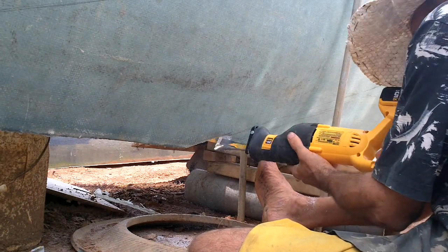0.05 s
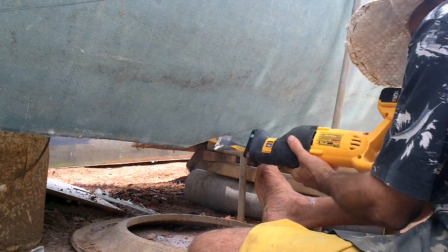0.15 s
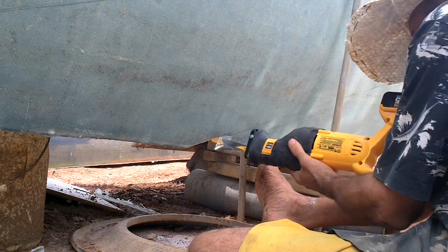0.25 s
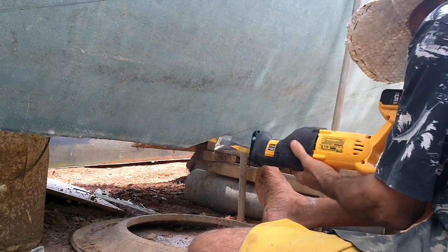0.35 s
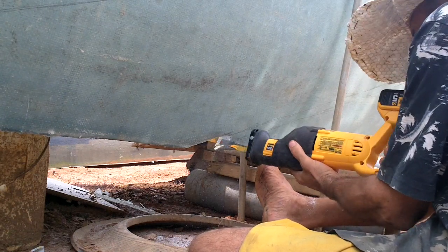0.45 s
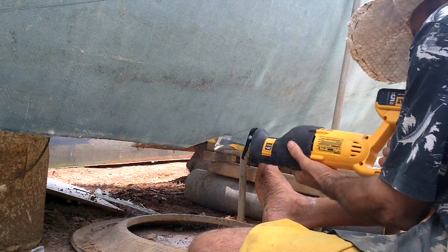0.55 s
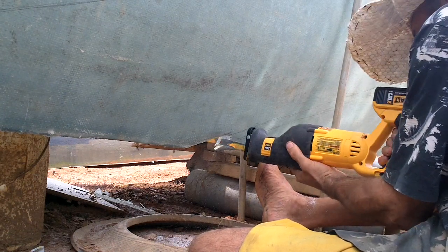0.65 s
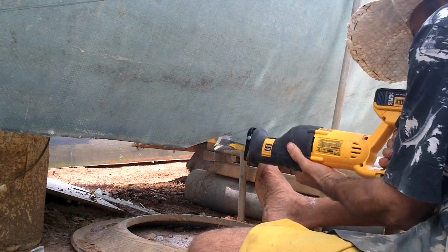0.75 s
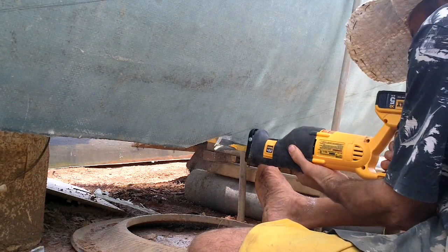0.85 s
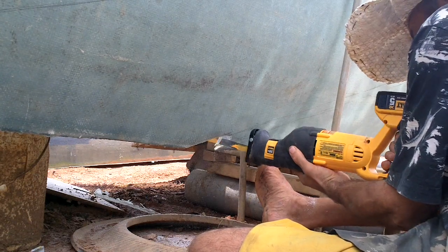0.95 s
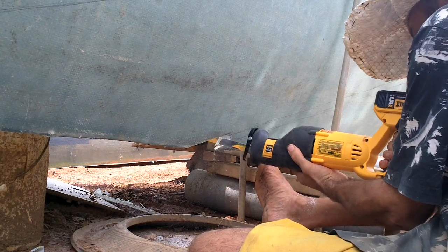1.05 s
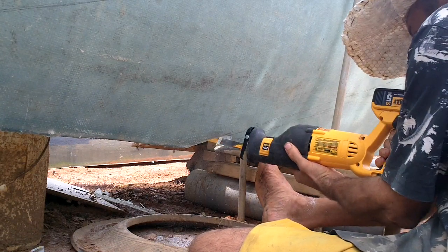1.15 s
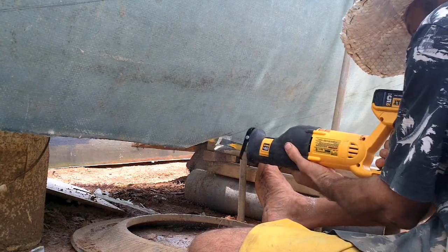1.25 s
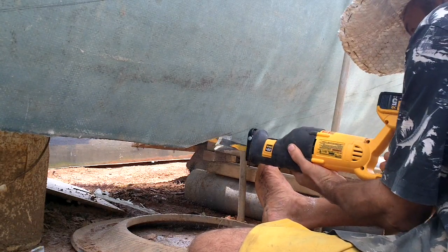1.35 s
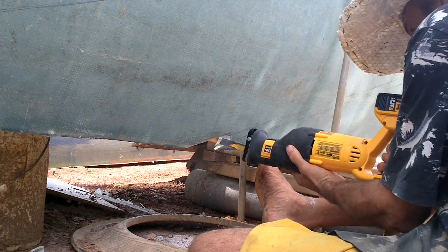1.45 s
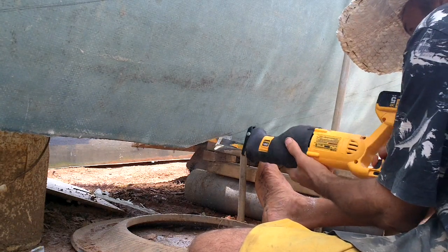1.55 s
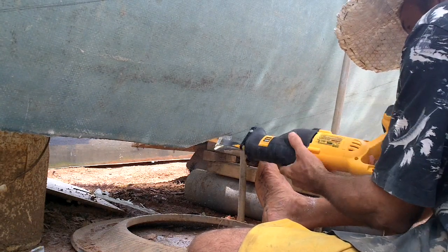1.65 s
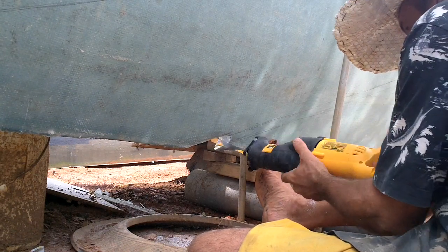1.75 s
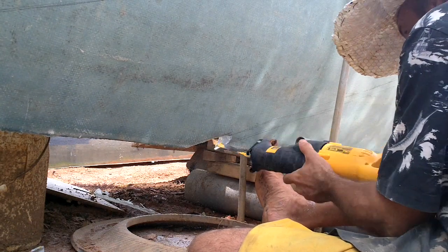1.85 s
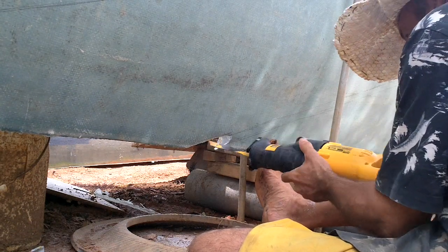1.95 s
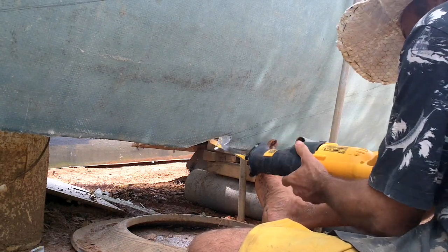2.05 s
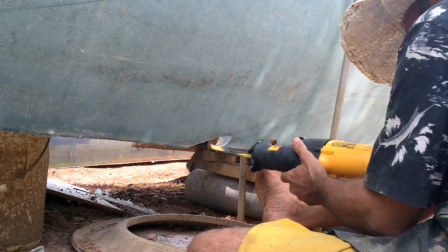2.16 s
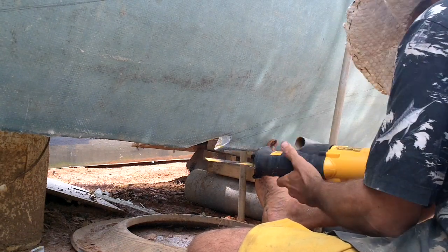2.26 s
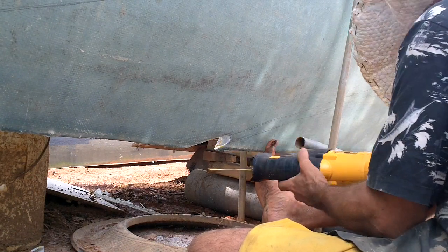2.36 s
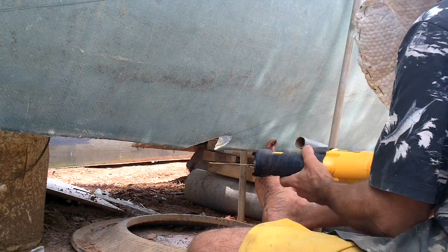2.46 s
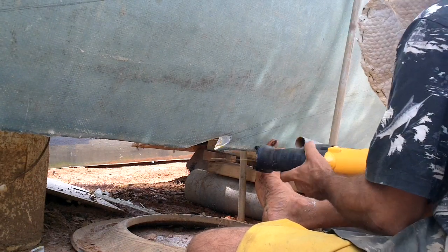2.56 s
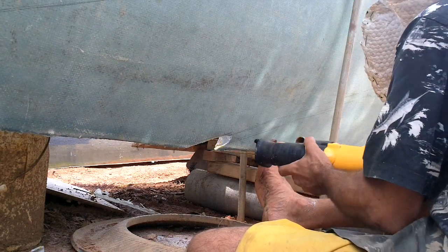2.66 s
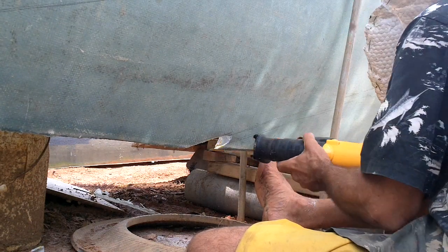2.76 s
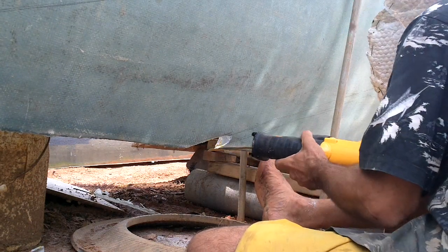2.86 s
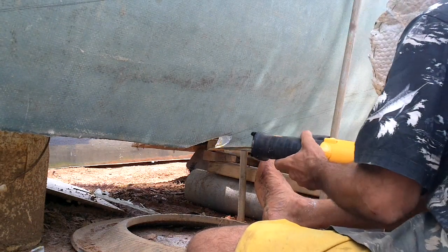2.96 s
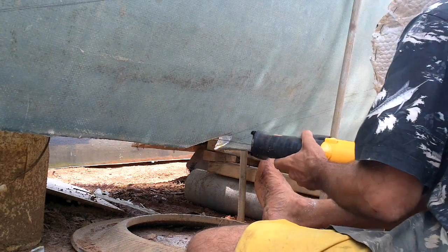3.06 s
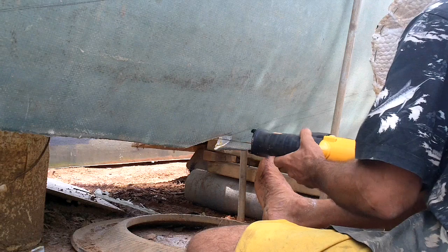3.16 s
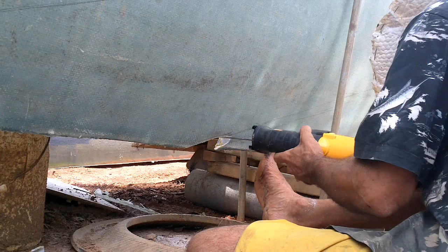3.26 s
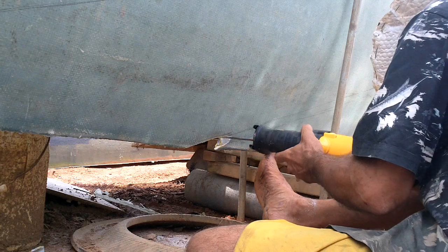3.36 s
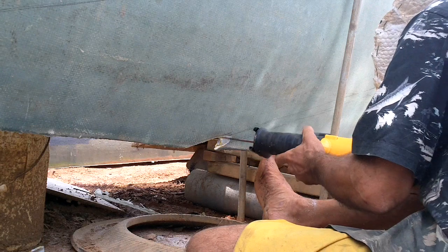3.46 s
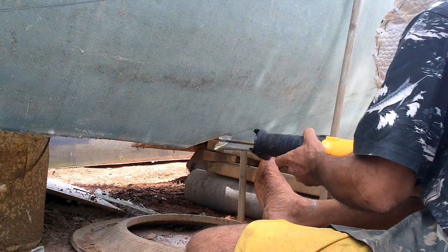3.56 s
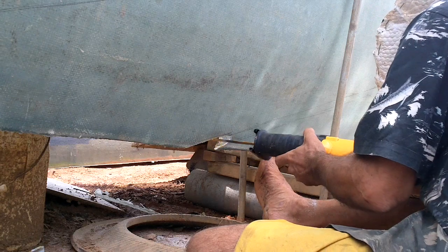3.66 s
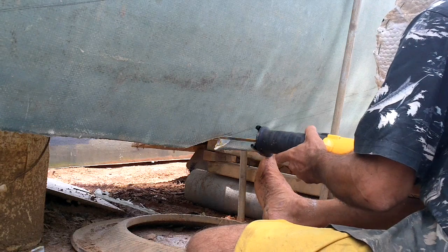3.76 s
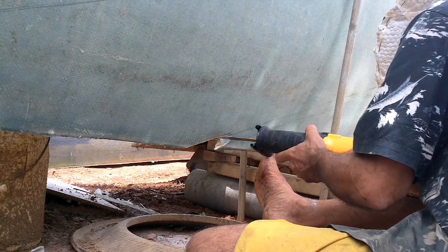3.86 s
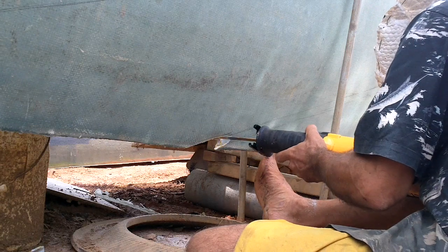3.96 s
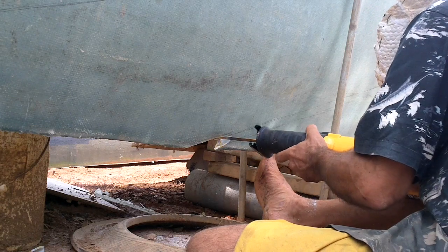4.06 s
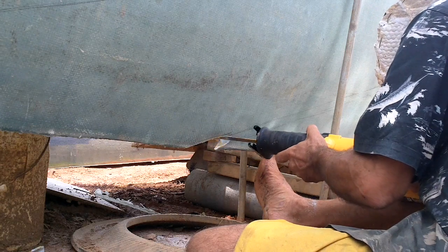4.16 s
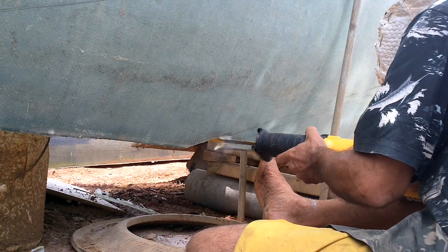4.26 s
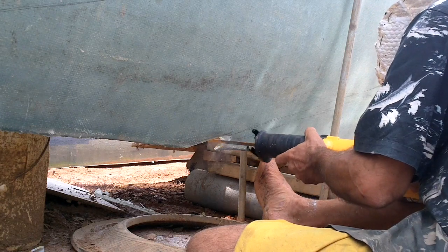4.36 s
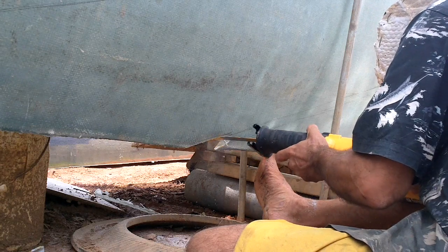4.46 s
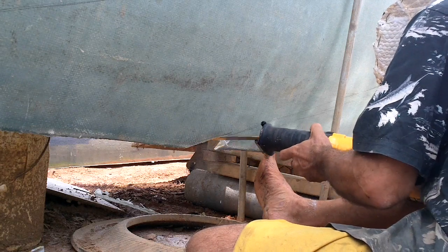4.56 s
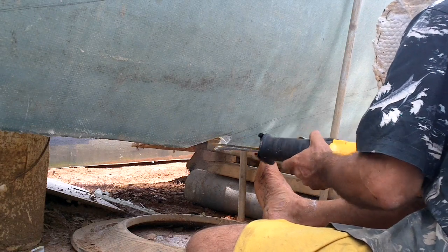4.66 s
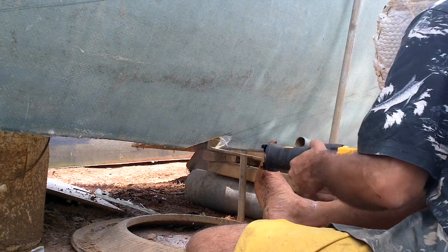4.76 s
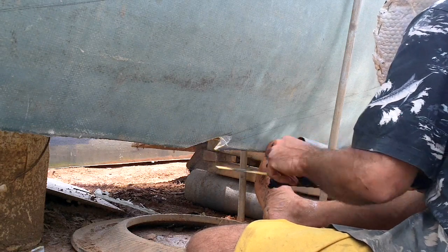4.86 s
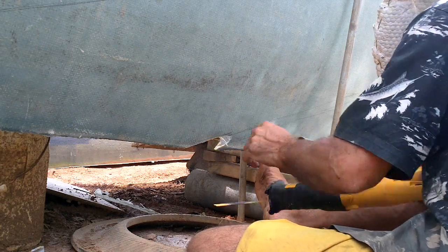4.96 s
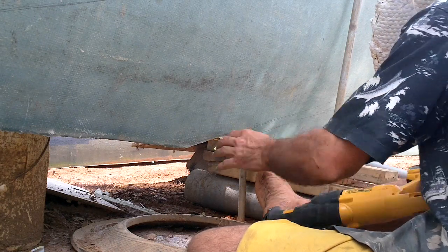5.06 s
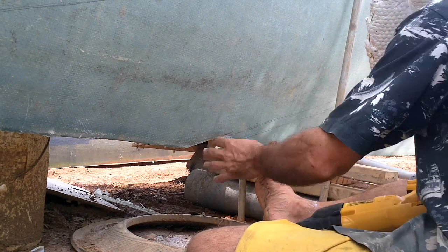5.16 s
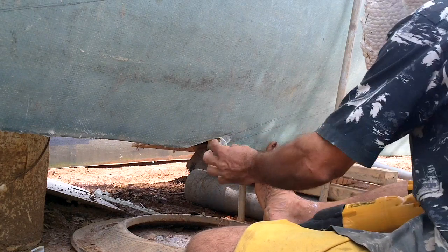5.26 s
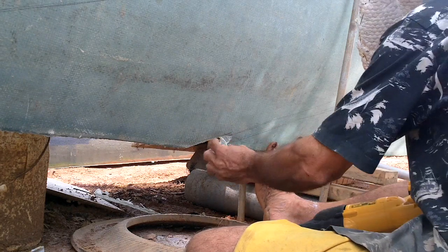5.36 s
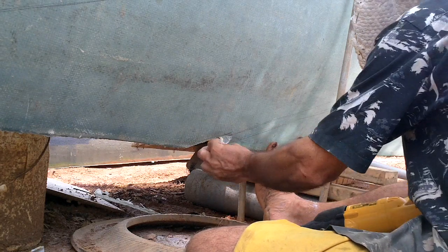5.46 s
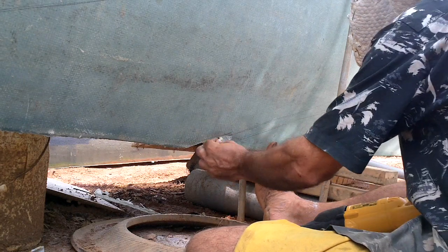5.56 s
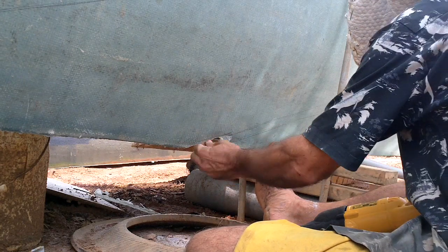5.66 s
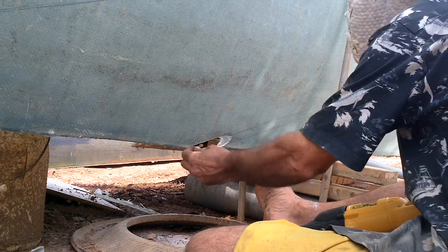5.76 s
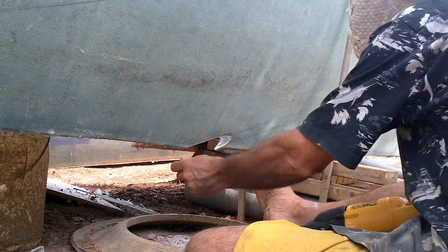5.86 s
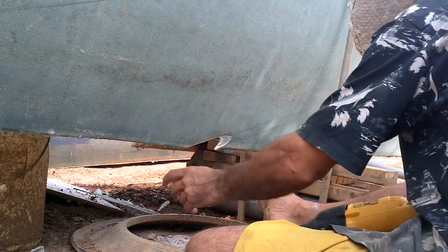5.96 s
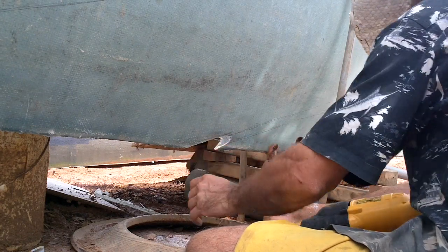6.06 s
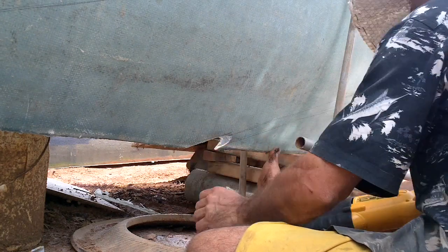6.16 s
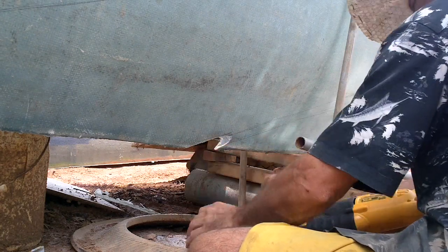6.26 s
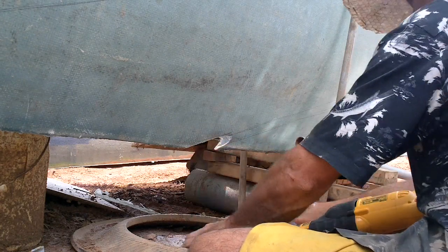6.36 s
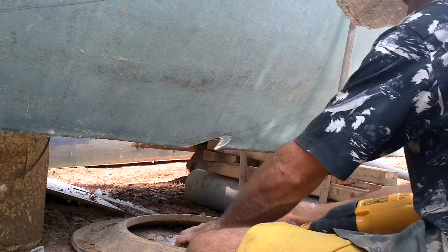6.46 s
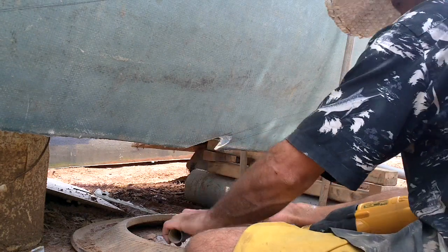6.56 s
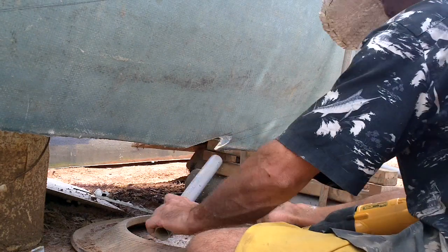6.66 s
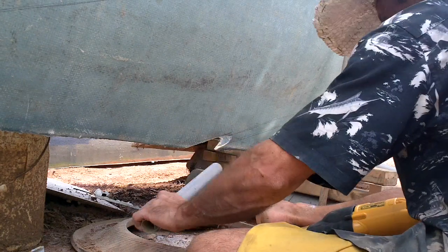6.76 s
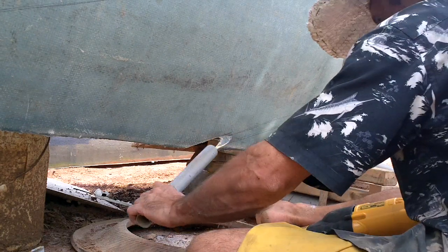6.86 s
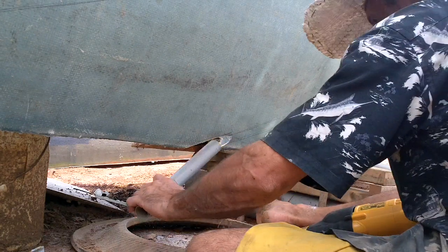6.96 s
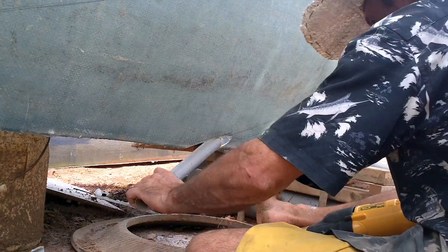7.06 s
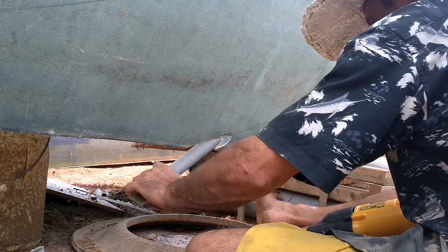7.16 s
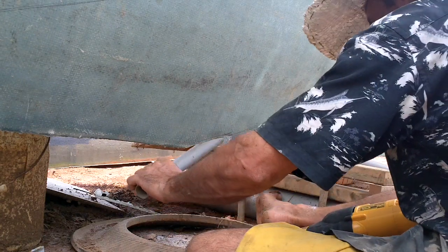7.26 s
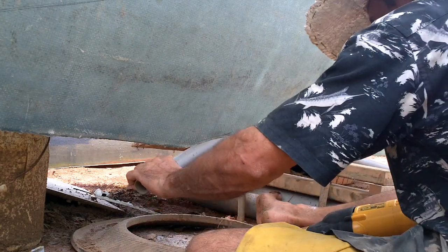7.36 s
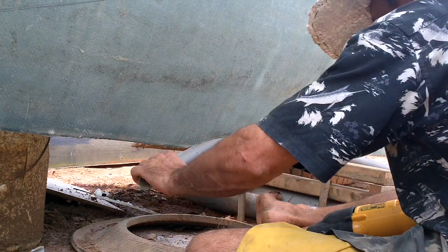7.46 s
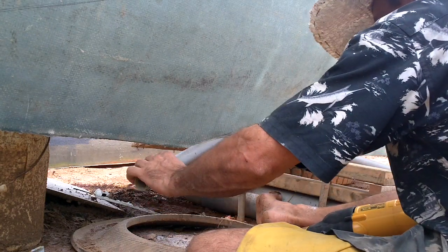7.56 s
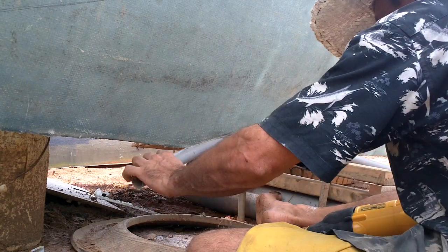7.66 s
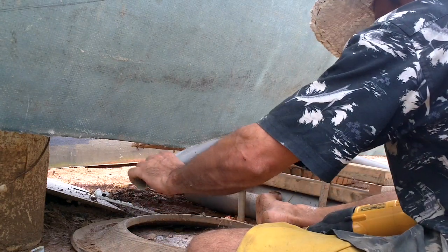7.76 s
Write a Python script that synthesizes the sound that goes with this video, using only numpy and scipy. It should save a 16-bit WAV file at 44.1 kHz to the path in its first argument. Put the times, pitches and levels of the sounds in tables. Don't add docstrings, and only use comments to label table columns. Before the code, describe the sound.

A trigger click, a thin motor whistle and uneven knocks lead into a harsh metallic saw rattle, about forty strokes a second, with deep vibration. After it cuts off there are light clicks, scrapes and plastic taps while the saw is repositioned. It whirs up again and bites briefly with ringing pipe slaps, then stops. Setting-down clicks, one sharp clack, then faint handling and a small snap, recorded close outdoors with a short echo from under the hull.

```python
import sys
import numpy as np
from scipy import signal
from scipy.fft import rfft, irfft, next_fast_len
from scipy.io import wavfile
from scipy.ndimage import uniform_filter1d

SR = 44100
rng = np.random.default_rng(int(sys.argv[2]) if len(sys.argv) > 2 else 0)


def output_pcm(signal):
    pcm = np.clip(np.atleast_2d(signal).T, -1, 1) * 32767
    wavfile.write(sys.argv[1], SR, np.round(pcm).astype(np.int16))


def level_to_linear(level):
    exponent = np.asarray(level, float) / 20
    return 10 ** exponent


N = 344718
T = np.arange(N) / SR

# (time [s], stroke rate [1/s], crank shake [dB])
FIRST_CUT = [(0.38, 35.2, -29.5), (0.522, 38.4, -38.5), (0.63, 40.6, -36), (1.03, 39.7, -26.5),
             (1.174, 38.2, -29), (1.225, 37.2, -30), (1.33, 34.7, -31.5), (1.414, 38.2, -39),
             (1.5, 40.5, -33), (1.71, 39.3, -36.5), (1.77, 38, -52)]
SECOND_CUT = [
    (4.05, 44.26, -62),
    (4.412, 42.86, -44.5),
    (4.46, 41.26, -46),
    (4.598, 40.57, -53),
    (4.66, 41.2, -69),
]
# (start [s], end [s], thump level [dB], rise [s], fall [s])
BLADE_AT_WORK = [
    (.5, 1.55, -33.5, .05, 0.27),
    (4.01, 4.55, -25.5, 0.074, 0.067),
]
# (frequency [Hz], width [Hz], level [dB])
HULL_RINGS = [(347, 29, -2.5), (445.5, 17.4, 3), (523, 86, -3.5), (568, 25.5, 4), (725, 92, -14),
              (820, 27, -9), (1050, 270, -13)]
# (frequency [Hz], level per Hz [dB])
BOOM_TONE = [(15, -3), (30, -10), (90, -7.5), (130, -15.5), (400, -87.5)]
# (time [s], peak level [dB], main ring [Hz])
THUDS_FIRST_CUT = [(0.086, -26, 270), (0.223, -34, 363), (0.229, -16, 323), (0.247, -22.5, 229),
                   (0.279, -20.5, 290.6), (0.354, -15.5, 220.5), (0.366, -24.5, 398), (0.373, -20, 240),
                   (0.41, -18.5, 239), (0.464, -16, 564), (1.618, -21, 346), (1.672, -20, 185)]
THUDS_PAUSE = [(1.787, -30, 265), (1.763, -52, 537), (1.864, -31.5, 568), (1.982, -46, 466),
               (2.108, -39.5, 479), (2.233, -34.5, 447), (2.309, -45, 530), (2.659, -51, 269),
               (2.839, -50, 280), (3.154, -40, 275), (3.214, -34.5, 199), (3.257, -33.5, 573),
               (3.414, -38, 225), (3.434, -47, 300), (3.459, -37.5, 422), (3.476, -40, 223)]
THUDS_SECOND_CUT = [(3.749, -25.5, 526), (3.775, -20.5, 586), (3.81, -25.5, 546), (3.922, -17.5, 585),
                    (4.006, -12.5, 523), (4.073, -26, 514)]
THUDS_AFTER = [(5.283, -37.5, 302), (6.884, -52, 400), (7.139, -31.5, 398), (7.185, -36.5, 250),
               (7.269, -40.5, 203), (7.341, -46.5, 240), (7.523, -45.5, 192), (7.598, -40, 177)]
ALL_THUDS = THUDS_FIRST_CUT + THUDS_PAUSE + THUDS_SECOND_CUT + THUDS_AFTER


def evened(x):
    return x / np.sqrt(np.mean(x ** 2) + 1e-20)


def noise():
    return rng.standard_normal(N)


def curve(tables, column, off=-120.):
    out = np.full(N, off)
    for rows in tables:
        s, value = np.transpose(rows)[[0, column]]
        out = np.maximum(out, np.interp(T, s, value, left=off, right=off))
    return out


def swell(rows):
    t = T[::32]
    levels = []
    for start, end, db, rise, fall in rows:
        outside = np.maximum((start - t) / rise, (t - end) / fall)
        levels.append(db - 20 * np.maximum(outside, 0))
    return np.interp(T, t, np.max(levels, axis=0))


def coloured(x, points):
    f, db = np.transpose(points)
    size = next_fast_len(N)
    hz = np.fft.rfftfreq(size, 1 / SR)
    gain = level_to_linear(np.interp(np.log(hz + 1), np.log(f + 1), db))
    return irfft(rfft(x, size) * gain, size)[:N]


def ring(x, modes):
    out = np.zeros(len(x))
    for k, (hz, width, db) in enumerate(modes):
        out += (-1) ** k * level_to_linear(db) * signal.lfilter(*signal.iirpeak(hz, hz / width, SR), x)
    return out


def drift(per_s):
    count = int(N / SR * per_s) + 2
    return np.interp(T, np.linspace(0, N / SR, count), rng.standard_normal(count))


def grains(per_s, spread_db):
    size = level_to_linear(spread_db * np.minimum(rng.exponential(1, N), 3))
    present = rng.random(N) < per_s / SR
    return evened(size * present * rng.choice([-1, 1], N))


def bursts(turns, start, fall, spread_db):
    size, late = rng.standard_normal((2, 400))
    position = turns - start + 1
    stroke = position.astype(int)
    since = position % 1 - .012 * (1 + np.tanh(late[stroke]))
    attack = np.clip(since / (1.7 * fall), 0, 1)
    return level_to_linear(spread_db * size[stroke]) * np.exp(-np.maximum(since, 0) / fall) * attack


def place(out, s, sound):
    out[round(s * SR):][:len(sound)] += sound


def saw():
    # (time [s], clatter level [dB])
    pulls = [
        [(0.0, -64), (0.094, -40.5), (0.184, -34.5), (0.224, -34.5), (0.324, -38.5), (0.41, -23.5),
         (0.54, -23.5), (1.697, -23), (1.706, -31), (1.732, -33), (1.75, -82)],
        [(3.56, -91), (3.576, -50), (3.79, -47), (3.874, -41.5), (4.026, -32), (4.22, -24), (4.508, -25.5),
         (4.628, -25.5), (4.74, -77)],
    ]
    # (first time [s], second time [s])
    stroke_ends = (0.9803, 4.332)
    speed = curve([FIRST_CUT, SECOND_CUT], column=1, off=0.)
    turns = np.cumsum(speed) / SR
    first, second = (.06 - np.interp(s, T, turns) % 1 + 1 for s in stroke_ends)
    turns = turns + np.where(T < 3, first, second)
    effort = curve(pulls, column=1)
    drive = gear_push(turns, speed)
    layers = level_to_linear(effort + 2.0) * gear_clatter(drive) + blade_thumps(turns) + steel_ringing(drive, turns, effort)
    return layers + shake(turns, speed) + whistle() + slaps()


def gear_push(turns, speed):
    ends = 2.2 * bursts(turns, .1, .11, 1.5) + 1.8 * bursts(turns, .6, .1, 1.8)
    ends = ends + .75 * bursts(turns, .8, .05, 3.)
    strength = np.where(T < 3, .2 + ends, .4 + .75 * ends)
    strength = np.where(speed > 0, strength, .75)
    rubbing = strength * (noise() + .45 * grains(2000., 3.))
    knock = 6.5 * np.diff(np.floor(turns - .15), prepend=0)
    knock = knock - 5 * np.diff(np.floor(turns - .65), prepend=0)
    return rubbing + knock * (speed > 0)


def gear_clatter(drive):
    # (frequency [Hz], level per Hz [dB])
    gear_tone = [(350, -29), (600, -5.5), (1260, -5.5), (1850, 4.5), (2640, 4), (7800, -9), (10100, -27.5),
                 (17200, -120)]
    # (frequency [Hz], width [Hz], level [dB])
    housing = [(1295, 125, 10), (1837, 115, 8), (2060, 320, 0), (2500, 17, -1.5), (5690, 390, 1),
               (3600, 1210, 5), (5057, 300, 2)]
    return evened(coloured(0.5 * drive + ring(drive, housing), gear_tone))


def steel_ringing(drive, turns, effort):
    # (frequency [Hz], width [Hz], level [dB])
    steel_rings = [(10077, 77, 1.5), (10160, 18, 5.5), (10500, 560, -19), (12300, 30, -4),
                   (13460, 80, -15.5), (8700, 120, -22.5)]
    # (frequency [Hz], level per Hz [dB])
    hiss_tone = [(7000, -51), (8500, -2), (10500, -9.5), (12000, -13.5), (14500, -13), (15600, -14)]
    # (start [s], end [s], level [dB], rise [s], fall [s])
    loose_blade = [(.18, .36, -50.5, 0.053, 0.11)]
    steel = evened(ring(drive * (0.18 + bursts(turns, 0.28, 0.18, 4.9)), steel_rings))
    steel = steel + 0.75 * evened(coloured(drive, hiss_tone))
    chime_db = np.maximum(5 + 1.693 * effort, swell(loose_blade))
    return level_to_linear(chime_db - 6.0) * steel


def blade_thumps(turns):
    # (time [s], level [dB])
    bites = [(0.093, -29.5), (0.228, -20), (0.356, -17.5), (0.467, -19), (1.8, -49), (3.755, -31),
             (3.789, -33.5)]
    blow = bursts(turns, 0.3028, 0.0042, 6.6)
    blow = evened(blow - uniform_filter1d(blow, size=300))
    thump = ring(0.91 * blow + 4.1 * noise(), HULL_RINGS)
    thump = thump / np.sqrt(uniform_filter1d(thump ** 2, size=6000))
    bite_db = swell(BLADE_AT_WORK + [(s, s, db, 0.025, 0.088) for s, db in bites])
    return level_to_linear(bite_db - 2.0) * thump


def shake(turns, speed):
    # (multiple of the stroke, level [dB])
    flex_first = [(1, 0), (2, -6), (3, 0.5), (4, -20), (5, -6), (6, -6.5), (7, -6.5), (8, -10), (9, 0),
                  (10, -15), (11, -6), (12, -12), (13, -15), (14, -30)]
    flex_second = [(1, 0), (2, -1.5), (3, -18.5), (4, -10.5)]
    # (flex share, flex [dB], rotor share, rotor [dB])
    follow = [(.3, -24, 0.5, -14.), (.95, 3.5, 0.11, -62)]
    panel_hz, panel_width_hz, panel_db = 184.7, 6.2, 12
    out = np.zeros(N)
    cuts = zip((FIRST_CUT, SECOND_CUT), (flex_first, flex_second), follow)
    for rows, orders, (flex_share, flex_db, rotor_share, rotor_db) in cuts:
        load = curve([rows], column=2)
        levels = load, flex_share * load + flex_db, rotor_share * load + rotor_db
        crank, flex, rotor = (uniform_filter1d(level_to_linear(db) * (load > -119), size=1800) for db in levels)
        out += crank * level_to_linear(drift(13.0)) * np.sin(2 * np.pi * turns + 4.9 + .2 * drift(14.0))
        out += rotor * level_to_linear(1 + drift(20.)) * np.sin(2 * np.pi * 9 * turns + .2 * drift(18.))
        out += crank * level_to_linear(-26.0) * evened(coloured(noise(), BOOM_TONE))
        for k, db in orders[1:]:
            spread_db = 1.3 if k in (3, 5) else 4.
            wobble = level_to_linear(db + spread_db * drift(18)) * (k != 9)
            wobble = wobble * level_to_linear(panel_db / (1 + ((k * speed - panel_hz) / panel_width_hz) ** 2))
            phase = k * turns + rng.random() + 0.14 * drift(16.0)
            out += flex * wobble * np.sin(2 * np.pi * phase)
    return np.sqrt(2) * out


def whistle():
    # (time [s], level [dB])
    switching = [
        [(.012, -29), (.03, 0), (.3, 9), (.4, -16)],
        [(3.565, -23), (3.58, -2), (3.9, 0), (4.0, 11), (4.05, -18)],
    ]
    # (frequency [Hz], level [dB])
    winding_tones = [(1820, -58), (2955, -56), (3666, -53), (3925, -43.5), (5400, -57)]
    out = np.zeros(N)
    for hz, db in winding_tones:
        out += level_to_linear(db - 7.0 + 1.5 * drift(40.)) * np.sin(2 * np.pi * hz * T + .06 * drift(60.0))
    return out * level_to_linear(curve(switching, column=1))


def slaps():
    # (time [s], peak level [dB], ring [Hz])
    pipe_slaps = [(4.123, -14, 490), (4.145, -25.5, 496), (4.171, -25.5, 599), (4.212, -24.5, 581),
                  (4.236, -20, 551.3), (4.257, -16.5, 506), (4.277, -17.5, 547), (4.301, -16, 557),
                  (4.328, -18, 568), (4.371, -15, 557.4), (4.396, -11, 542), (4.418, -12, 568),
                  (4.461, -20, 456), (4.491, -14.5, 567), (4.511, -33.5, 519.7), (4.541, -21, 515),
                  (4.567, -25.5, 450)]
    # (time [s], peak level [dB], frequency [Hz], fall [s])
    clean_rings = [(.347, -19, 550, 0.019), (.462, -13.5, 567, 0.012), (.464, -25, 446, 0.01),
                   (3.811, -24, 542, 0.008), (4.008, -16, 340.4, 0.019), (4.02, -12.5, 443, 0.035),
                   (4.075, -9.5, 457, 0.012), (4.097, -17, 442, 0.011), (6.886, -36, 2050, 0.0032),
                   (6.886, -37, 3490, 0.0022), (6.886, -43, 5420, .002), (6.886, -43.5, 638, 0.0027),
                   (7.147, -23, 262, 0.0054), (7.16, -37.5, 239, .05)]
    rise_s, fall_s = .004, 0.006
    out, knock, t = np.zeros(N + 9000), np.zeros(N), np.arange(9000) / SR
    for s, db, hz, fall in [(s, db - 2, hz, fall_s) for s, db, hz in pipe_slaps] + clean_rings:
        shape = np.minimum(t / rise_s, 1) * np.exp(-np.maximum(t - rise_s, 0) / fall)
        place(out, s, level_to_linear(db) * shape * np.sin(2 * np.pi * hz * t))
    for s, db, _ in pipe_slaps:
        knock[round(s * SR)] = level_to_linear(db - 2.5 + 38.5)
    return out[:N] + ring(knock, HULL_RINGS)


def hits():
    # (frequency [Hz], level [dB])
    plastic = [(500, 2.5), (6500, -8.5), (9000, -7.5), (15000, -8)]
    return coloured(clicks() + thuds() + free_blade(), plastic)


def clicks():
    # (time [s], peak level [dB], main ring [Hz])
    trigger = [
        (0.0153, -24.5, 1130),
        (0.0458, -39, 4630),
        (3.5725, -33, 3600),
    ]
    first_start = [(0.0733, -13, 2100), (0.1487, -7, 2310), (0.1674, -13, 5000), (0.2039, -8, 3200),
                   (0.2653, -11.5, 2050), (0.3262, -11.5, 2120), (0.3725, -7, 3200), (0.3495, -14.5, 2200)]
    snags = [(0.5177, -14.5, 1810), (0.6299, -10.5, 1300), (0.6668, -6, 1900), (0.7814, -11, 1845),
             (0.805, -18.5, 1700), (0.8796, -10.5, 1800), (0.9821, -9.5, 2100), (1.2796, -9.5, 2501),
             (1.337, -10, 2120), (1.405, -7, 1810), (1.5033, -12.5, 1320), (1.5527, -11, 1343),
             (1.602, -10.5, 2509), (1.6311, -14.5, 2122)]
    pull_out = [(1.7814, -14, 2660), (1.8158, -27.5, 1050), (1.8512, -24.5, 2000), (1.9315, -37.5, 1486),
                (2.0098, -32.5, 1490), (2.0991, -34.5, 1050), (2.1644, -37, 4550), (2.1995, -30.5, 2150),
                (2.2268, -31.5, 875), (2.2739, -32.5, 1480), (1.895, -35, 2200), (2.055, -50, 1500),
                (2.298, -36, 3000), (2.308, -30.5, 2220), (2.322, -37, 1500), (2.336, -46, 2400),
                (2.835, -45.5, 930), (2.8965, -39, 1770)]
    line_up = [(3.0993, -36, 3160), (3.1515, -23, 2320), (3.1807, -21.5, 1720), (3.2064, -14, 2460),
               (3.254, -14.5, 2030), (3.125, -37.5, 2000), (3.142, -36, 1900), (3.4022, -31, 1000),
               (3.452, -41, 1200), (3.518, -46, 3000), (3.168, -32, 2440), (3.228, -37, 2400)]
    second_start = [(3.686, -27, 2200), (3.89, -23.5, 2500), (4.011, -14.5, 2300), (3.607, -26, 2140),
                    (3.8288, -20, 2030), (3.9562, -13.5, 2148), (4.0621, -11, 2060)]
    teeth = [(4.1187, -9, 2960), (4.1027, -16.5, 1260), (4.1352, -9.5, 1310), (4.1502, -5.5, 2394),
             (4.1626, -6, 2200), (4.177, -9.5, 1330), (4.1905, -3.5, 1900), (4.2135, -21, 2440),
             (4.231, -15.5, 1700), (4.2843, -12.5, 1750), (4.3078, -12, 1310), (4.3323, -6, 2520),
             (4.3556, -14.5, 2080), (4.3657, -5, 1500), (4.4125, -16.5, 1630), (4.4465, -7, 2340),
             (4.4704, -9, 1610), (4.5193, -9, 1260), (4.5731, -13.5, 1330), (4.5453, -8, 2000),
             (4.5996, -6.5, 2110)]
    set_down = [(4.6952, -23.5, 1510), (4.782, -39, 2050), (4.8514, -34.5, 1370), (4.9865, -16.5, 2400),
                (5.0146, -22.5, 2500), (5.0415, -15.5, 2500), (5.0812, -24.5, 2030), (4.886, -32.5, 1400),
                (5.021, -25, 2500), (5.1053, -30, 3380), (5.112, -25, 3400), (5.1512, -35.5, 1360),
                (5.1781, -27.5, 2800), (5.413, -31, 2400), (5.423, -30, 1740)]
    clack = [(5.2375, -25, 2570), (5.244, -21.5, 4800), (5.2612, -16.5, 2800), (5.2745, -20, 2820),
             (5.2852, -6.5, 2720), (5.3, -18.5, 1410)]
    pipe = [(5.7394, -49, 1590), (6.0411, -44, 1295), (6.0896, -45, 2850), (6.4961, -44.5, 2010),
            (6.5231, -42.5, 1510), (6.553, -43.5, 2500), (6.5929, -40, 3600), (6.6456, -43.5, 2330),
            (7.1355, -30.5, 2030), (7.5902, -43, 1650)]
    snap = [(6.8845, -32, 3490), (6.8892, -22, 2130)]
    # (frequency [Hz], width [Hz], level [dB])
    saw_body = [(1360, 90, -7.5), (2050, 98, 1.5), (2382, 100, -4.5), (3470, 190, -3), (3690, 100, -8),
                (4800, 160, -3.5), (5740, 94, -6.5)]
    # (clicks, rattle [ms], 5 kHz [dB], 10 kHz [dB], main ring [dB], saw body [dB])
    spells = [
        (trigger, 3.2, 2., -30, 4.9, 3.9), (first_start, 6.5, -2.5, -15, 14, 9.),
        (snags, 5.9, -6, -20, 4., 6.), (pull_out, 5.9, -3, -14.5, 4.8, 2.8),
        (line_up, 6.8, -1.5, -8.5, 9.7, 4.1), (second_start, 10, -10.5, -23.5, 9., 4.5),
        (teeth, 4.3, -10.5, -22.5, 4.3, 2.7), (set_down, 10, 0.5, -24, 6.2, 5.3),
        (clack, 7., 1.2, -23, 3., 5.8), (pipe, 4.8, -11, -31.5, 7, -12), (snap, 5.7, 0.9, -19.5, 16, -15)]
    out, t = np.zeros(N + 9000), np.arange(9000) / SR
    for rows, rattle_ms, mid_db, top_db, ring_db, body_db in spells:
        for s, db, hz in rows:
            crack = rng.standard_normal(9000) * (np.exp(-(1000 * t / rattle_ms) ** 1.6) + .05 * level_to_linear(-900 * t))
            crack = crack * (np.minimum(5000 * t / rattle_ms, 1) + .3 * np.exp(-t / .0015))
            crack[110] += 2.5
            modes = [(hz, 260, ring_db), (1.72 * hz, 260, -3), (2300, 2800, -4),
                     (5400, 2200, mid_db), (12500, 6500, top_db + .4 * db + 2)]
            sound = ring(crack, modes) + level_to_linear(body_db) * ring(crack, saw_body)
            place(out, s, level_to_linear(db) * sound / abs(sound).max())
    return out[:N]


def thuds():
    out, t = np.zeros(N + 9000), np.arange(9000) / SR
    for s, db, hz in ALL_THUDS:
        push = rng.standard_normal(9000) + 5.7 * (t < .0012)
        push = push * np.exp(-t / 0.014) * np.minimum(t / 0.0062, 1)
        push = signal.lfilter(*signal.butter(2, 1300, fs=SR), push)
        sound = ring(push, [(hz, 30, 6.), (0.606 * hz, 40, hz / 40 - 12.), (950, 500, -11.)])
        sound = sound + (hz / 520) ** 2 * ring(push, HULL_RINGS) * level_to_linear(-120 * t)
        place(out, s, level_to_linear(db) * sound / abs(sound).max())
    return out[:N]


def free_blade():
    # (time [s], level [dB])
    blade_knocks = [(1.715, -46), (3.1, -66), (3.26, -58), (4.66, -49), (5.287, -47), (6.89, -69)]
    # (frequency [Hz], level [dB], time to fall 60 dB [s])
    blade_tones = [(3066, 0, .9), (4830, -0.5, .12), (5114, -1, .2), (5860, -2, .18), (10100, -2, 0.26),
                   (12350, -12, .17), (13460, -10, .3)]
    out, t = np.zeros(N + 9000), np.arange(9000) / SR
    fade = np.hanning(18000)[9000:]
    for s, db in blade_knocks:
        tones = sum(level_to_linear(db + d - 60 * t / t60) * np.sin(2 * np.pi * f * t) for f, d, t60 in blade_tones)
        place(out, s, tones * fade)
    return out[:N]


def handling():
    # (peak time [s], scrape [dB], rise [s], fall [s], rustle over scrape [dB])
    moves = [(1.7, -46.5, 0.0092, 0.44, -9), (2.1, -68, 2.24, 0.49, -7), (2.32, -53, 0.16, 0.28, -8),
             (3.27, -48, 0.16, 0.05, -4.5), (3.44, -55.5, 0.08, 0.08, -5), (3.5, -65, 1.1, 0.1, -7),
             (4.64, -48, 0.0098, 0.063, -5), (4.97, -43, 0.31, 0.042, -10), (5.04, -56, 0.057, 0.71, -15),
             (5.42, -59.5, 1.8, 0.054, -4), (5.55, -70.5, 0.13, 1.24, -2), (6.27, -64, 0.42, 0.4, -4),
             (7.26, -56, 0.14, 0.025, -14), (7.54, -69, 1.9, 0.94, -3), (7.59, -54, 0.089, 0.037, -5)]
    # (peak time [s], boom [dB], rise [s], fall [s], rumble over boom [dB])
    leans = [(.09, -36, 0.18, 0.24, -6.5), (5.29, -50, .03, .1, -13), (.38, -23.5, 0.12, 0.26, -0.5),
             (1.67, -23.5, 0.24, 0.33, -9), (2.3, -47, 0.19, 0.17, -3.5), (3.22, -52, 0.18, 0.34, -18),
             (3.8, -45.5, 0.25, 0.17, 8.5), (4.68, -49, 0.97, 0.023, 10.5), (4.77, -44.5, 0.75, 0.2, -9.5),
             (4.9, -58, 0.1, 0.2, 12.5), (5.71, -63.5, 0.16, 0.15, 5.5), (6.1, -69.5, 0.85, 3.4, -5),
             (7.61, -59, 0.22, 0.1, 4.5)]
    # (frequency [Hz], level per Hz [dB])
    scrape_tone = [(410, -50), (700, -10), (1310, -3.5), (3480, -6.5), (5020, -15), (6950, -22.5),
                   (8020, -31.5), (11000, -26.5), (15800, -30.5)]
    rumble_tone = [(59, -29.5), (140, -4), (290, -1.5), (390, -10.5), (528, -6), (636, -12.5),
                   (1200, -33.5), (1560, -46), (2640, -120)]
    # (start [s], end [s], level [dB], rise [s], fall [s])
    pipe_slide = [(6.2, 6.38, -63.5, 0.36, 0.73)]
    # (frequency [Hz], width [Hz], level [dB])
    slide_rings = [(4670, 540, 0.5), (5920, 500, -5), (2500, 1250, 2)]
    grit = (0.62 * grains(830.0, 5.3) + noise()) * level_to_linear(4.6 * drift(60.))
    scrape = coloured(grit, scrape_tone)
    dull, bright = (evened(signal.lfilter(*signal.butter(3, 4200, kind, fs=SR), scrape))
                    for kind in ("low", "high"))
    rub, rustle = gestures(moves)
    weight, creak = gestures(leans)
    after_thud = swell([(s, s, db - 11.5, 0.0067, 0.12) for s, db, _ in ALL_THUDS])
    under_blade = swell(BLADE_AT_WORK) - 14.
    creak = np.maximum(creak, level_to_linear(np.maximum(after_thud, under_blade)))
    boom, rumble = (evened(coloured(noise() * level_to_linear(1.6 * drift(30.)), c)) for c in (BOOM_TONE, rumble_tone))
    slide = level_to_linear(swell(pipe_slide)) * evened(ring(noise(), slide_rings))
    return slide + rub * dull + rustle * bright + level_to_linear(-2.5) * weight * boom + level_to_linear(3.0) * creak * rumble


def gestures(rows):
    main = swell([(s, s, db, up, down) for s, db, up, down, _ in rows])
    companion = swell([(s, s, db + rel, up, down) for s, db, up, down, rel in rows])
    return level_to_linear(main), level_to_linear(companion)


def yard():
    # (frequency [Hz], level per Hz [dB])
    air_tone = [(20, 0.5), (65, 2.5), (203, -5.5), (431, -9), (3040, -23), (4140, -28), (4760, -28),
                (6840, -30.5), (8090, -29), (10100, -31.5), (13700, -39.5), (15800, -50.5)]
    # (frequency [Hz], level [dB])
    drones = [(4823, -86), (6595, -86.5), (6621, -98.5), (7101, -90)]
    buzz_per_s, buzz_rings = 59.94, [(6500, 800, 0)]
    air = evened(coloured(noise() * level_to_linear(1.0 * drift(6.2)), air_tone))
    whines = sum(level_to_linear(db + 4.5) * evened(ring(noise(), [(hz, 50, 0)])) for hz, db in drones)
    ticks = np.diff(np.floor(buzz_per_s * T), prepend=0) * level_to_linear(1.5 * drift(buzz_per_s))
    buzz = evened(ring(ring(ticks, buzz_rings), buzz_rings))
    return level_to_linear(-63 + 2.5) * air + whines + level_to_linear(-81.5) * buzz


def scene():
    near = saw() + hits() + handling()
    t = np.arange(6000) / SR
    echo = rng.choice([-1., 1.], 6000) * (rng.random(6000) < .05)
    echo = echo * level_to_linear(-60 * t / .11) * (t > .003)
    echoed = signal.oaconvolve(near, echo / np.linalg.norm(echo))[:N]
    mix = near + level_to_linear(-11.0) * echoed + yard()
    return np.array([mix, mix])


def starved(x):
    hz, _, z = signal.stft(x, SR, nperseg=2048)
    band = uniform_filter1d(abs(z) ** 2, size=9, axis=0)
    luck = uniform_filter1d(rng.standard_normal(z.shape), size=9, axis=0) * 3
    upper = (abs(z[hz > 900]) ** 2).sum(0)
    weak = (hz[:, None] > 7300) & (band < upper * level_to_linear(-31. - 20 + 3.5 * luck) ** 2)
    z = z * ~weak
    scrambled = z * np.exp(2j * np.pi * rng.random(z.shape))
    return [signal.istft(v, SR, nperseg=2048)[1][:N] for v in (z, scrambled)]


def top_cut(x):
    return signal.sosfilt(signal.butter(12, 16230, fs=SR, output="sos"), x)


def record(dry):
    # (frequency [Hz], level [dB])
    roll_off = [(100, -0.5), (15000, -1), (15750, -7), (16230, -22.5)]
    # (frequency [Hz], width [Hz], depth [0-1])
    port_notches = [(4200, 300, .68), (7870, 1000, .98), (8950, 500, .95), (12750, 450, .88)]
    # (frequency [Hz], side over middle [dB])
    side_tone = [(110, -61), (380, -48), (700, -34.5), (1290, -25), (2380, -7.5), (4400, -3.5), (8120, 3),
                 (15000, 9)]
    mid = coloured(dry.mean(0), roll_off)
    for hz, width, depth in port_notches + port_notches:
        mid = mid - np.clip(depth, 0, 1) * ring(mid, [(hz, width, 0)])
    mid, scattered = starved(mid)
    side = level_to_linear(-6.5) * coloured(scattered, side_tone)
    lag = coloured(np.gradient(mid), [(200, -40), (600, 0), (9000, 0), (15000, 9)])
    side = side - .36 * lag
    return top_cut(np.array([mid + side, mid - side]))


dry = scene()
out = record(dry)
output_pcm(out)
```